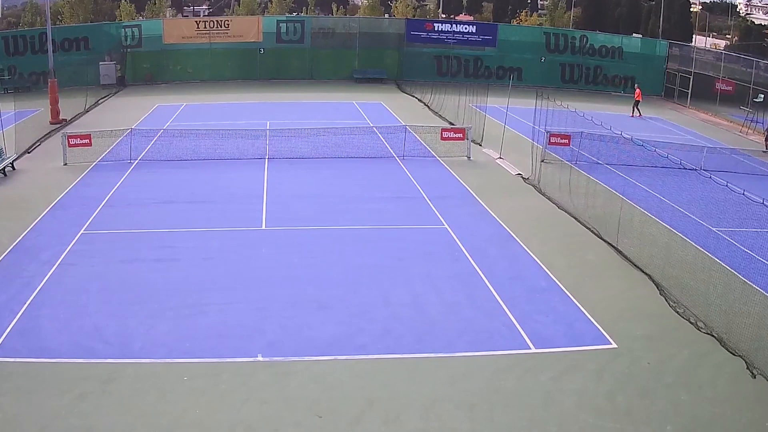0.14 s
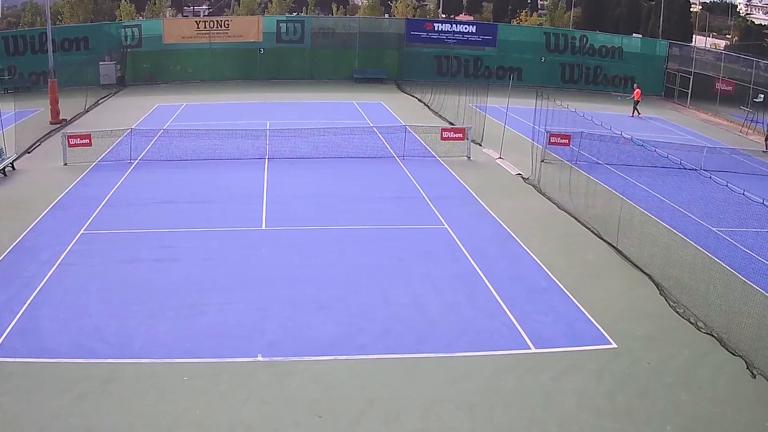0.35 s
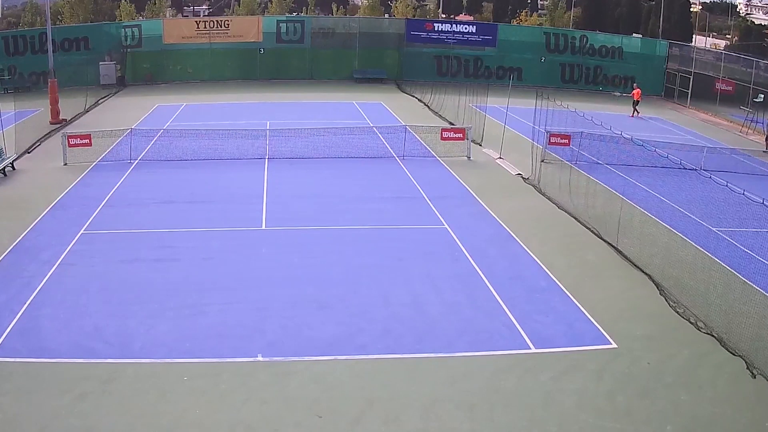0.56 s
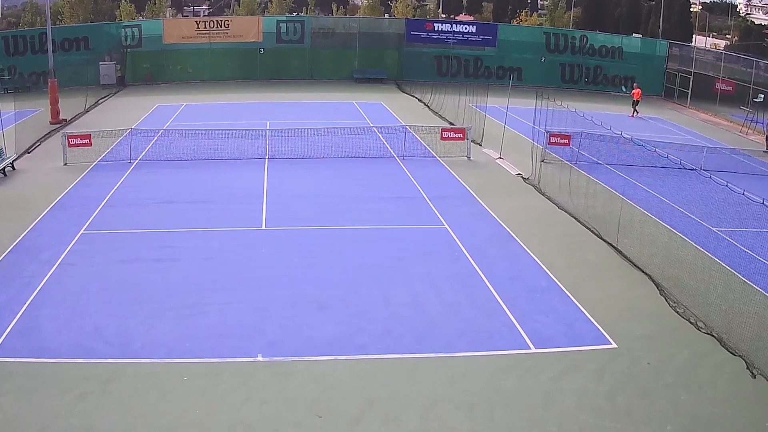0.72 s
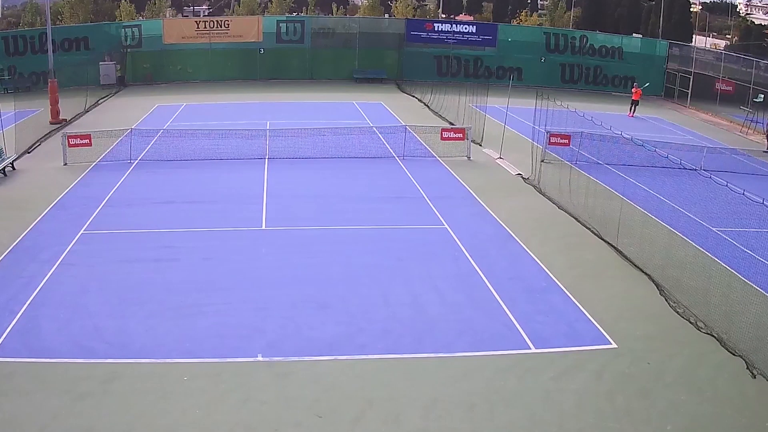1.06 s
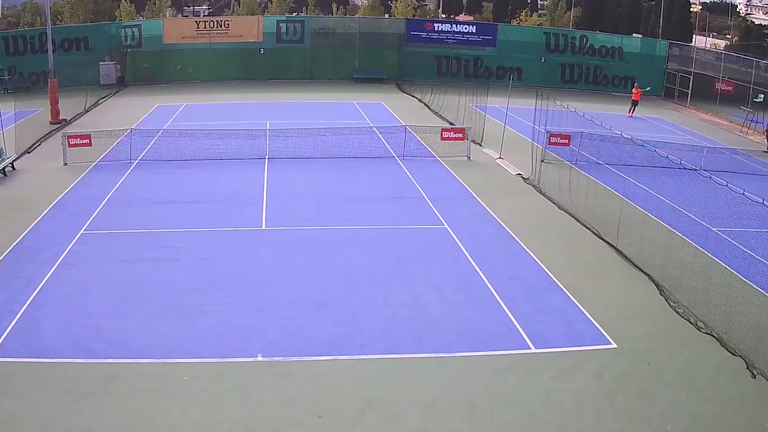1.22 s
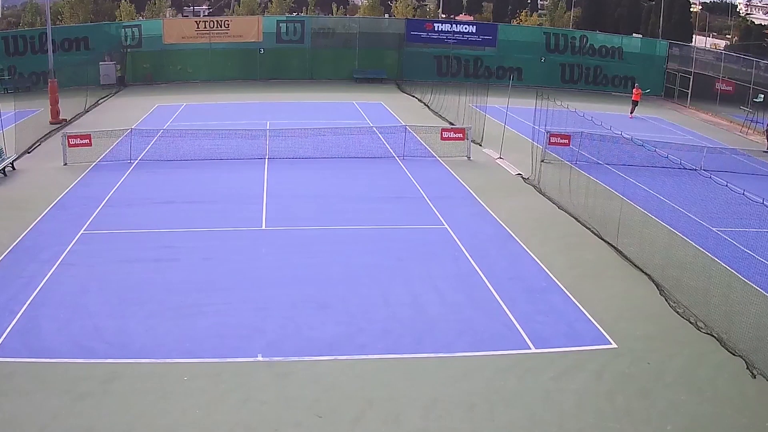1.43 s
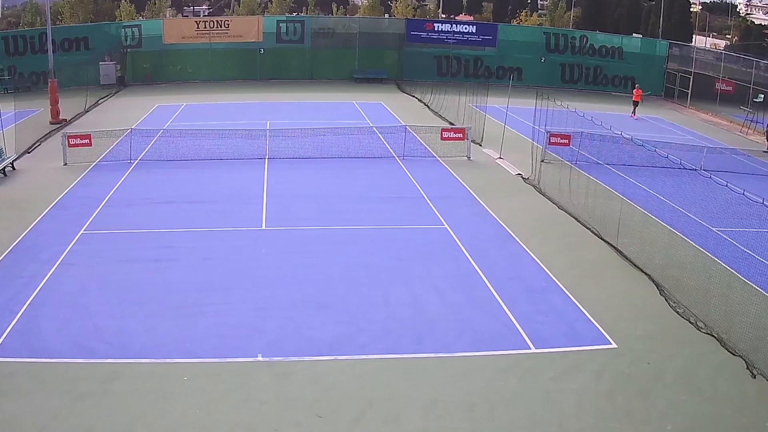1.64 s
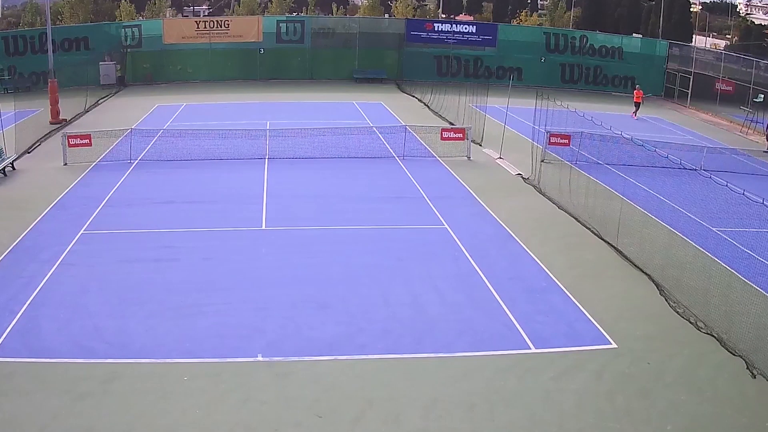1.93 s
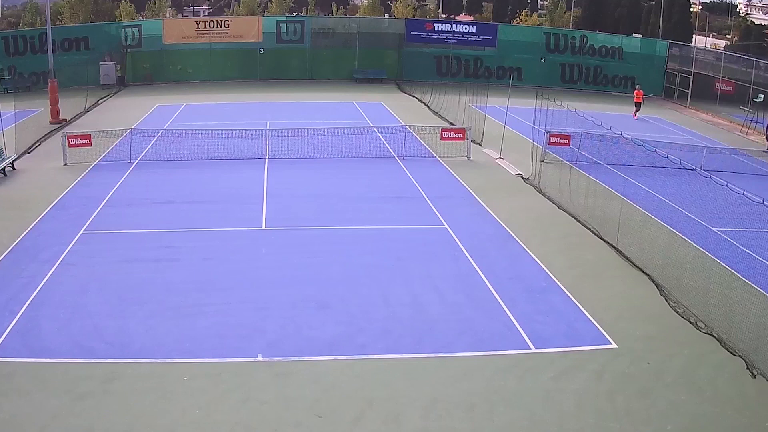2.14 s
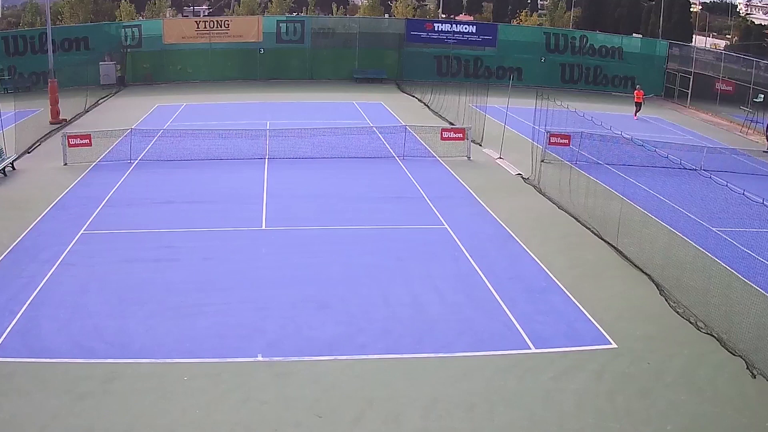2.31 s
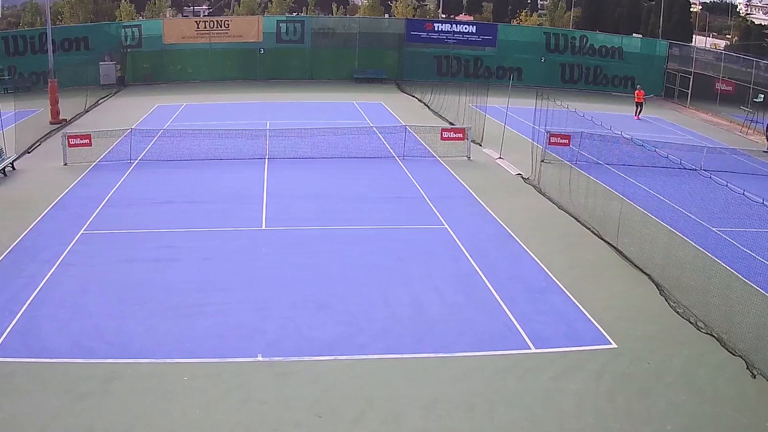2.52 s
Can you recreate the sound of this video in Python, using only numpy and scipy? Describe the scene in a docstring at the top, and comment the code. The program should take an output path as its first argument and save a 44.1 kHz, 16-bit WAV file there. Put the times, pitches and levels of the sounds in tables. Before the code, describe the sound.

Tennis play heard from a distance outdoors: a single thumping, cracking stroke, then a hollow bounce and two more close together, with short echoes, muffled road noise, engine rumble and low wind bumps at the microphone.

```python
"""An outdoor tennis court: one sharp racket stroke, then a few duller, more distant ball bounces.
Strokes and bounces are decaying modes, the stroke with a noise crack; fences and the far wall answer
with filtered echoes and a noise tail. Coloured noise makes the rest: distant tyre roar and engine rumble,
one vehicle swelling midway, and soft low puffs of wind on the microphone."""
import sys
import numpy as np
from scipy import signal
from scipy.fft import rfft, irfft, next_fast_len
from scipy.io import wavfile
from scipy.ndimage import map_coordinates

SR = 44100
rng = np.random.default_rng(int(sys.argv[2]) if len(sys.argv) > 2 else 0)


def transcribe(signal):
    """Save signal, clipped to [-1, 1], as a 16-bit WAV file at the path in sys.argv[1]."""
    frames = np.atleast_2d(signal).T
    limited = np.clip(frames, -1, 1)
    pcm = np.round(limited * 32767).astype(np.int16)
    wavfile.write(sys.argv[1], SR, pcm)


N = 117747  # length [samples]


def amp(db):
    """Decibels to gain."""
    return 10 ** (np.asarray(db) / 20)


def unit(x):
    """Scale to rms 1."""
    return x / np.sqrt(np.mean(x ** 2) + 1e-20)


def curve(rows):
    """Draw straight lines through (time [s], value) rows, one value per sample."""
    return np.interp(np.arange(N) / SR, *np.transpose(rows))


def wobble(rate):
    """A smooth random curve through `rate` random knots a second."""
    knots = rng.standard_normal(int(N * rate / SR) + 4)
    return map_coordinates(knots, [np.arange(N) * rate / SR])


def filtered(x, response):
    """Shape the spectrum of x by a gain that is a function of frequency [Hz]."""
    size = next_fast_len(N + 8192)
    hz = np.fft.rfftfreq(size, 1 / SR)
    return irfft(rfft(x, size) * response(hz), size)[:N]


def noise(spectrum):
    """Noise of rms 1 coloured by (frequency [Hz], relative level [dB]) points."""
    knot_hz, knot_db = np.transpose(spectrum)

    def colour(hz):
        return amp(np.interp(np.log(hz + 1), np.log(knot_hz + 1), knot_db))

    return unit(filtered(rng.standard_normal(N), colour))


def delayed(x, seconds):
    """Start x later by the given seconds."""
    return np.pad(x, (max(round(seconds * SR), 0), 0))[:N]


def ring(modes, contact_s, scatter=1):
    """Damped sine modes that build up during the contact; scatter=0 starts them all in step."""
    t = np.arange(N) / SR
    tones = 0
    for hz, db, t60 in modes:
        phase = scatter * rng.random()  # [cycles]
        tones = tones + amp(db - 60 * t / t60) * np.sin(2 * np.pi * (hz * t + phase))
    return tones * (1 - np.exp(-t / contact_s))


def traffic(waver_db=.5):
    """Tyre roar from distant roads: coloured noise with a slightly wavering level."""
    # colour of the tyre roar and hiss: (frequency [Hz], relative level [dB per Hz])
    roar_colour = [(60, -28.5), (200, -3), (300, 1.5), (400, -0.5), (560, 0.5), (760, -1.5), (950, -2.5),
                   (1130, -10.5), (1400, -16), (2000, -25), (2700, -32.5), (4000, -37.5), (5200, -42.5),
                   (6500, -46.5), (6850, -57.5), (7200, -80.5)]
    # loudness before the waver: (time [s], level [dB])
    roar_level = [(0, -45.4), (.5, -46), (.8, -44.5), (.92, -44), (1.02, -45.5), (1.13, -44.5),
                  (1.3, -45.5), (1.62, -45), (1.72, -46.5), (1.95, -45), (2.06, -44), (2.2, -45.5),
                  (2.45, -46), (2.67, -44.5)]
    level_db = curve(roar_level) + waver_db * wobble(22)
    return amp(level_db) * noise(roar_colour)


def rumble(swell_db=-0.46):
    """Far engines drone unevenly: bass noise under a slowly wandering level."""
    # colour of the engine drone: (frequency [Hz], relative level [dB per Hz])
    drone_colour = [(10, -20.5), (25, -6.5), (40, -3), (58, 1.5), (80, -1), (110, 0.5), (165, 0), (220, -1),
                    (320, -12.5), (600, -35.5), (4000, -120)]
    # loudness before the random swell: (time [s], level [dB])
    drone_level = [(0, -42), (.2, -42.5), (.45, -47.5), (.68, -42), (.8, -45), (1.05, -43.5), (1.32, -42.5),
                   (1.5, -46), (1.95, -43.5), (2.2, -44.5), (2.45, -44.5), (2.67, -45)]
    level_db = curve(drone_level) + swell_db * wobble(9.6)
    return amp(level_db) * noise(drone_colour)


def vehicle():
    """A far vehicle: low-mid noise that swells out of the traffic and fades on a bell curve."""
    # swells: (peak time [s], level [dB], standard deviation of the bell [s])
    passes = [(1.369, -48, 0.18)]
    # colour of its roar: (frequency [Hz], relative level [dB per Hz])
    roar_colour = [(150, -24.5), (240, -0.5), (300, -0.5), (450, -6.5), (700, -24), (2000, -62.5),
                   (4000, -120)]
    t = np.arange(N) / SR
    swell = sum(amp(db) * np.exp(-.5 * ((t - peak) / width) ** 2) for peak, db, width in passes)
    return swell * noise(roar_colour)


def wind():
    """Puffs on the microphone: bass noise that rises quickly, holds and falls away."""
    # puffs: (start [s], length from start to fall [s], level [dB])
    puffs = [(0.343, 0.1, -43.5), (0.865, 0.052, -38.5), (0.909, 0.088, -42), (1.107, 0.045, -42),
             (1.163, .02, -45), (1.599, 0.039, -40), (1.987, 0.11, -46), (2.622, 0.078, -43.5)]
    # colour of the wind: (frequency [Hz], relative level [dB per Hz])
    wind_colour = [(15, -22.5), (35, 0), (60, 4.5), (110, 1), (170, -4), (300, -19), (1000, -52),
                   (4000, -120)]
    rise_s, fall_s = 0.0041, 0.0021  # linear rise time, time constant of the fall
    t = np.arange(N) / SR
    flow = 0
    for start, length, db in puffs:
        rise = np.clip((t - start) / rise_s, 0, 1)
        fall = np.exp(-np.maximum(t - start - length, 0) / fall_s)
        flow = flow + amp(db) * rise * fall
    return flow * noise(wind_colour)


def racket():
    """The ball thumps and cracks against the strings, and both ring briefly as damped modes."""
    # racket strokes: (time [s], level [dB])
    strokes = [(0.5298, -31)]
    # ringing of ball and strings: (frequency [Hz], relative level [dB], decay by 60 dB [s])
    string_modes = [(426, -1.5, 0.045), (609, -0.5, 0.035), (960, -1.5, .05), (1270, 2.5, 0.024),
                    (1880, -10, 0.04), (2225, -5.5, 0.03), (3030, -19, .022), (3124, -10.5, 0.028),
                    (3830, -21, 0.026), (4170, -18.5, 0.039), (5200, -20, .018), (6300, -21, 0.015)]
    # low push of the flattening ball: (frequency [Hz], relative level [dB], decay by 60 dB [s])
    thump_modes = [(127, 4.5, 0.032), (304, -3.5, .035)]
    # colour of the contact crack: (frequency [Hz], relative level [dB per Hz])
    crack_colour = [(150, -5), (600, 5), (1100, 4.5), (1600, -5), (2300, -8), (3100, -13.5), (4500, -19),
                    (6400, -26.5), (7500, -26.5)]
    contact_s = 0.0022  # time constant as the strings take up the ball
    crack_db, crack_hold_s, crack_t60_s = -3.5, 0.0059, 0.022  # crack_db is relative to the stroke

    t = np.arange(N) / SR
    crack_decay = amp(crack_db - 60 * np.maximum(t - crack_hold_s, 0) / crack_t60_s)
    crack_envelope = (1 - np.exp(-t / contact_s)) * crack_decay
    thump = ring(thump_modes, contact_s, scatter=0)
    hits = 0
    for start, db in strokes:
        crack = crack_envelope * noise(crack_colour)
        hit = thump + ring(string_modes, contact_s) + crack
        hits = hits + delayed(amp(db) * hit, start)
    return hits


def court(x):
    """The direct sound, dull echoes from fences and wall, and a soft tail of scattered sound."""
    # fences and, last, the far wall: (delay [s], level [dB], half-gain frequency of the dulling [Hz])
    echo_paths = [(0.0141, -4, 1490), (0.02, -12.5, 1900), (0.0365, -15.5, 1200), (0.053, -24, 4800),
                  (0.066, -21, 4800), (0.085, -21.5, 4760), (0.097, -12.5, 1800), (0.1861, -13.5, 4800)]
    # colour of the scatter from fences and trees: (frequency [Hz], relative level [dB])
    scatter_colour = [(300, -1.5), (1000, 3.5), (1800, 2.5), (2400, 0), (3000, 0.5), (4200, 6.5),
                      (6000, -7.5), (7300, -24.5)]
    scatter_db, rise_s, t60_s = -17.5, .035, 0.94  # level, rise time constant, decay by 60 dB

    t = np.arange(N) / SR
    tail = noise(scatter_colour) * (1 - np.exp(-t / rise_s)) * amp(-60 * t / t60_s)
    tail = tail / np.linalg.norm(tail)
    scattered = amp(scatter_db) * signal.fftconvolve(x, tail)[:N]
    echoes = 0
    for delay, db, dull_hz in echo_paths:
        echo = filtered(delayed(x, delay), lambda hz: 1 / (1 + (hz / dull_hz) ** 6))
        echoes = echoes + amp(db) * echo
    return x + echoes + scattered


def bounces():
    """Far balls pop on the hard court: the hollow ball's modes start in step and die at once."""
    # distant bounces: (time [s], level [dB])
    landings = [(1.131, -34), (1.5749, -33.5), (1.7522, -30)]
    # the hollow ball: (frequency [Hz], relative level [dB], decay by 60 dB [s])
    ball_modes = [(431, -2, 0.017), (860, 2.5, 0.014), (1393, -4.5, 0.0073), (1597, -13.5, 0.0087),
                  (2160, -16, 0.006), (2540, -22.5, 0.0045)]
    pop = ring(ball_modes, contact_s=0.00079, scatter=0)
    return sum(delayed(amp(db) * pop, start) for start, db in landings)


def scene():
    """The play, echoed by the court, over traffic and wind."""
    play = court(racket() + bounces())
    background = traffic() + rumble() + vehicle() + wind()
    return (play + background)[None]


def record(dry):
    """Limit the band: the gain falls linearly to silence around the top frequency."""
    top_hz, slope_hz = 7560, 300  # half-gain frequency, width of the fall

    def band_edge(hz):
        return np.clip((top_hz - hz) / slope_hz + .5, 0, 1)

    return np.array([filtered(x, band_edge) for x in dry])


dry = scene()
out = record(dry)
transcribe(out)
```